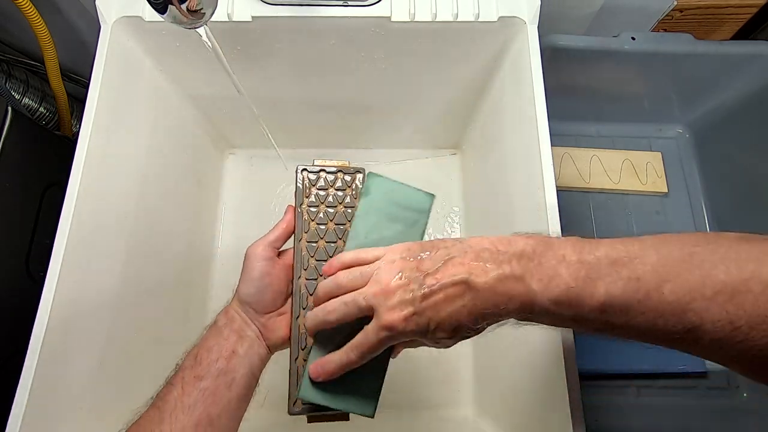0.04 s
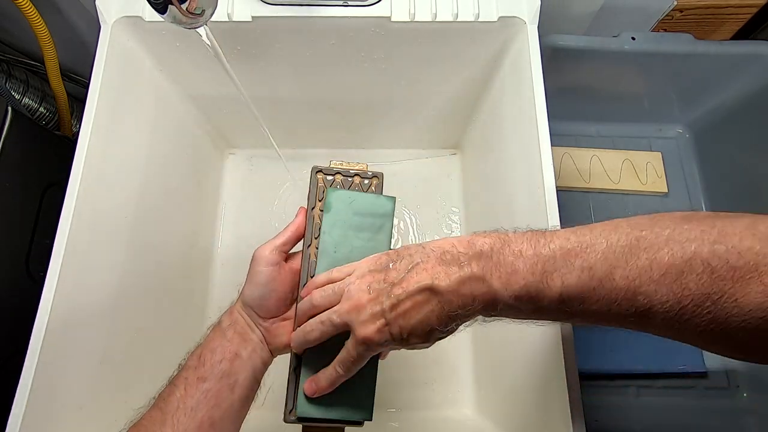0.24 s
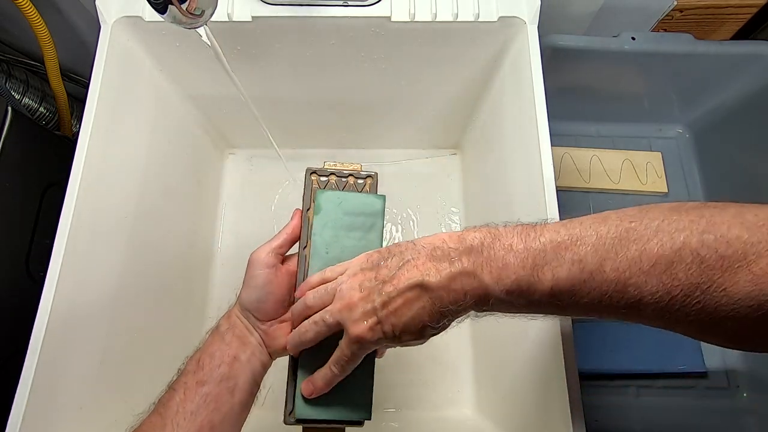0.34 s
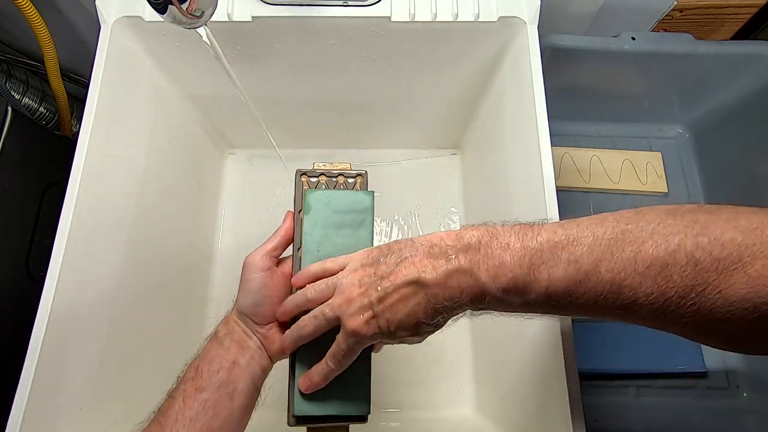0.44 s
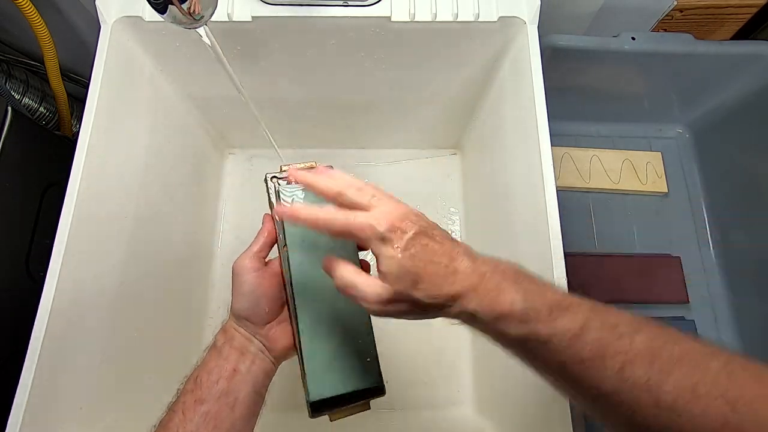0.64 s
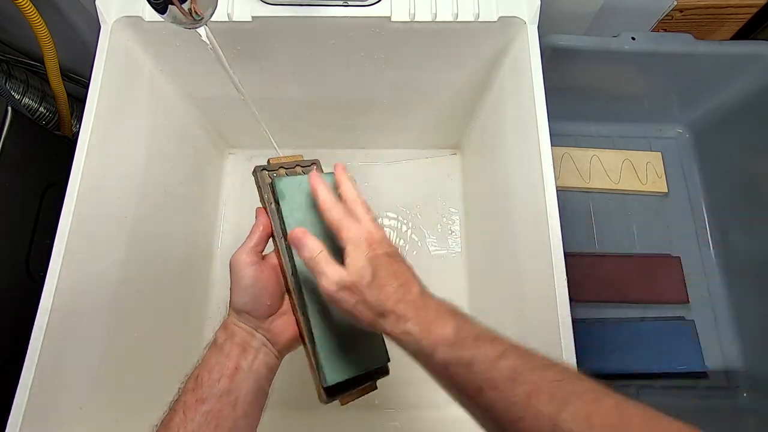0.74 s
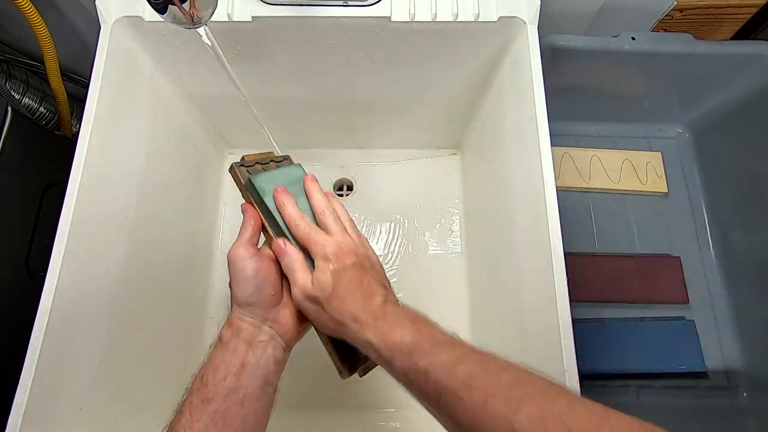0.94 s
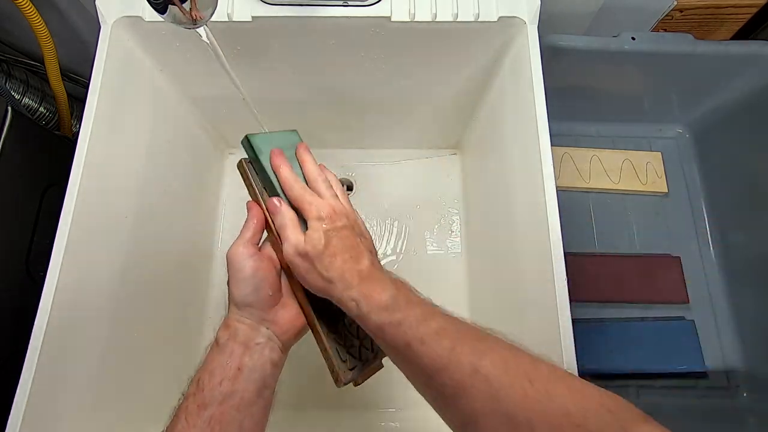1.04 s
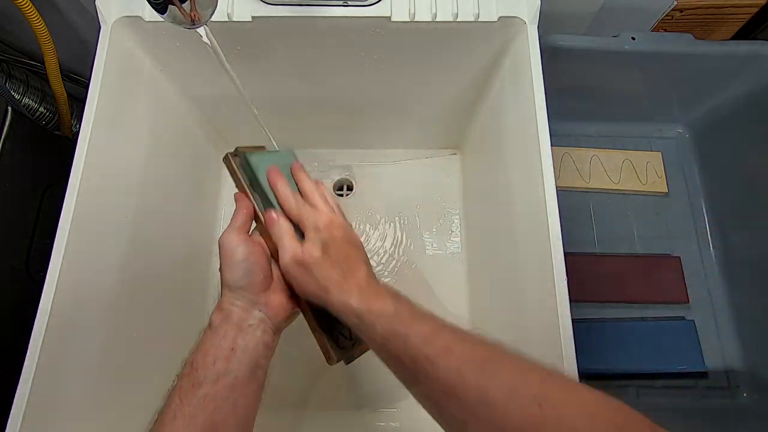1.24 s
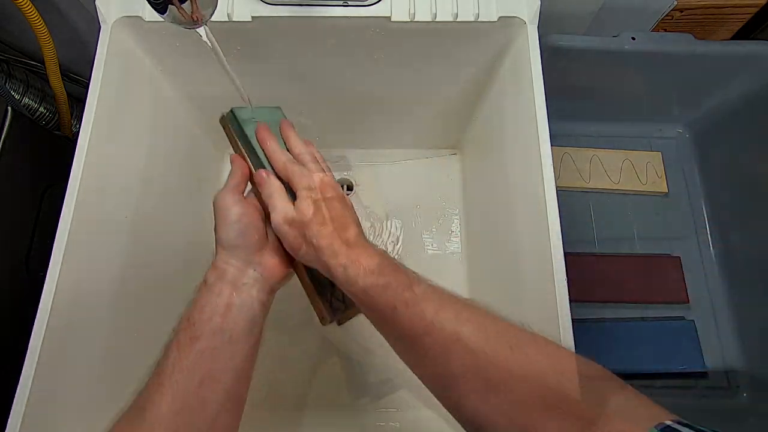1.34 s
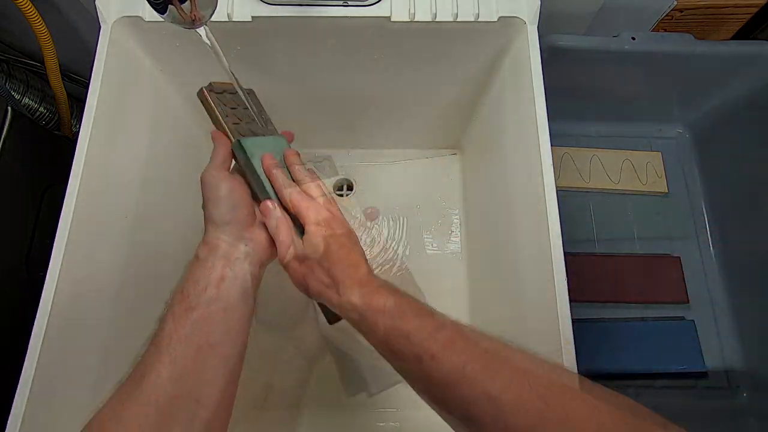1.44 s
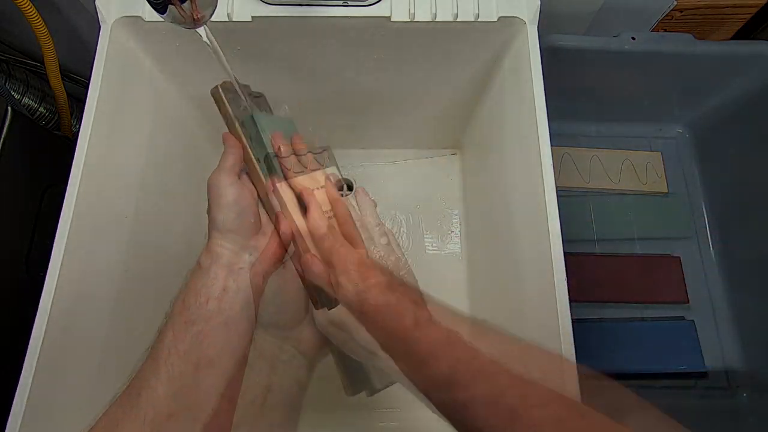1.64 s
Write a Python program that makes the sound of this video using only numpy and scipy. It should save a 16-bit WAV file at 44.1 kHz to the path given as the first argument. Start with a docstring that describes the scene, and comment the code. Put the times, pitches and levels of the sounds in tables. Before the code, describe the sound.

A sharpening stone clinks onto a metal plate three times between about 0.2 and 0.4 seconds, ringing briefly. A faint scrape follows at 0.5 seconds. From about 0.9 seconds to the end at 1.7, the stone rubs in uneven, gritty strokes with tiny squeaks and a thin ring. Throughout, a tap hisses softly into a plastic sink, heard close, with low basin thumps mostly after 1.2 seconds.

```python
"""Three metallic clinks, then gritty scraping in uneven strokes, over the hiss of a running tap.
A sharpening stone is set down on a metal lapping plate: each blow rings the plate's modes.
The stone is then rubbed along it: abrasive grains click, the stone catches and squeaks, the plate sings.
Both are held over a plastic sink; the tap's thin stream drums on the basin throughout."""
import sys
import numpy as np
from scipy import signal
from scipy.fft import rfft, irfft
from scipy.io import wavfile
from scipy.ndimage import uniform_filter1d, minimum_filter1d

SR = 44100
rng = np.random.default_rng(int(sys.argv[2]) if len(sys.argv) > 2 else 0)


def store_pcm(level_fs):
    """Save levels as 16-bit WAV."""
    pcm = np.round(np.clip(level_fs, -1, 1) * 32767).astype(np.int16)
    wavfile.write(sys.argv[1], SR, np.atleast_2d(pcm).T)


N = 74970  # 1.7 s


def undb(db):
    """Decibels to gain."""
    return 10 ** (np.asarray(db) / 20)


def unit(x):
    """Scale to rms 1."""
    return x / np.sqrt(np.mean(x ** 2))


def curve(points):
    """Gain over time from (s, dB) points."""
    return undb(np.interp(np.arange(N) / SR, *np.array(points).T))


def shaped(x, response):
    """Filter by a gain function of frequency; rms 1."""
    hz = np.fft.rfftfreq(N, 1 / SR) + 0.00094  # offset avoids 0 Hz
    return unit(irfft(rfft(x) * response(hz), N))


def colour(x, points):
    """Filter by (Hz, dB) points, falling away below the first; rms 1."""
    hz, db = np.array(points).T
    return shaped(x, lambda f: undb(np.interp(np.log(f), np.log(hz), db)) * np.minimum(f / hz[0], 1) ** 2)


def resonate(x, hz, width_hz):
    """One resonance applied twice; rms 1."""
    return shaped(x, lambda f: 1 / (1 + .5j * (f * f - hz * hz) / (f * width_hz)) ** 2)


def dull(x, cutoff_hz, order=12):
    """Low-pass: a softer contact has less treble; rms 1."""
    return shaped(x, lambda f: 1 / np.hypot(1, (f / cutoff_hz) ** order))


def noise():
    """White noise."""
    return rng.standard_normal(N)


def walk(rate_hz):
    """Smooth random wander; rms 1."""
    return shaped(noise(), lambda f: 1 / (1 + (f / rate_hz) ** 2) ** 2)


def flutter(depth_db, rate_hz):
    """Gain wandering about 0 dB by depth_db rms."""
    return undb(depth_db * walk(rate_hz))


def wobble(hz, spread_hz):
    """Tone whose pitch shakes by spread_hz rms."""
    return np.sin(2 * np.pi * np.cumsum(hz + spread_hz * walk(200 + spread_hz)) / SR)


def grains(per_s, spread_db):
    """Random clicks of uneven size."""
    clicks = (rng.random(N) < per_s / SR) * np.sign(noise())
    return clicks * undb(spread_db * np.minimum(rng.exponential(size=N), 5))


def fade(start_s, t60_s, attack_s=0):
    """Envelope of a blow: swell, then exponential decay."""
    age_s = np.maximum(np.arange(N) / SR - start_s, 0)
    swell = 1 - np.exp(-age_s / (attack_s + 2 / SR))
    return swell * np.exp(-np.log(1000) * age_s / t60_s)


def room(x, echo_db=-17):
    """Add the faint, short echo of a small washroom."""
    response = noise() * fade(start_s=0.0055, t60_s=0.16, attack_s=0.0072)
    response /= np.sqrt(np.sum(response ** 2))
    return x + undb(echo_db) * signal.fftconvolve(x, response)[:N]


def tap(hiss_db=-46.5):
    """Running water hisses and whistles in the spout."""
    # Spectrum of tap and splash. Each row: frequency in Hz, level in dB.
    hiss_spectrum = [(200, -7.5), (450, -3), (750, -3.5), (1300, -9), (2300, -8.5), (3200, -14),
                     (4400, -17.5), (5600, -8), (7000, -2.5), (8300, -4.5), (9500, -11), (11000, -6.5),
                     (13000, -18), (15500, -11.5)]
    # Spout resonances in Hz.
    spout_hz = [4862, 5365, 7280, 8335, 8825, 10235, 11330, 12330, 13995, 14976]
    # Each row, in the same order: width in Hz, level in dB.
    spout_modes = [(29.9, -61.5), (24.8, -64), (247, -56.5), (30, -53.5), (70, -63), (35, -56.5),
                   (70, -66.5), (150, -60), (70, -58), (171, -64)]
    hiss = undb(hiss_db) * flutter(0.5, rate_hz=93) * colour(noise(), hiss_spectrum)
    whistle = sum(undb(db) * resonate(noise(), hz, width_hz)
                  for hz, (width_hz, db) in zip(spout_hz, spout_modes))
    return hiss + whistle


def drumming():
    """Drops of the stream excite the basin's modes."""
    # Each row: frequency in Hz, width in Hz, level in dB.
    basin_modes = [(36, 60, -56.5), (85, 34.4, -44.5), (127.8, 15.5, -49), (199.4, 64, -49.5),
                   (438.3, 30, -55.5)]
    # Swell of the drumming. Each row: time in seconds, gain in dB.
    swell = [(0, 1.5), (0.45, -3.5), (0.75, -4.5), (1.0, -2), (1.1, 2), (1.19, -2.5), (1.35, -1), (1.48, 6),
             (1.56, -4), (1.7, -4)]
    basin = sum(undb(db) * resonate(grains(per_s=500, spread_db=0.5), hz, width_hz)
                for hz, width_hz, db in basin_modes)
    return curve(swell) * basin


def booms():
    """The plastic basin booms briefly and hums on its main mode under the stream."""
    # Each row: start in seconds, level in dB, pitch in Hz, t60 in seconds.
    events = [(0.413, -31.5, 390, .15), (0.465, -41, 77.3, 0.18), (1.246, -31, 88.7, 0.15),
              (1.338, -28.5, 84.3, 0.19), (1.621, -23.5, 155, .14), (1.655, -32.5, 90.2, 0.4)]
    # Each row: time in seconds, level in dB.
    hum_level = [(1.02, -64), (1.1, -44), (1.19, -71), (1.235, -56), (1.26, -36), (1.32, -48),
                 (1.38, -44.5), (1.48, -37.5), (1.57, -56)]
    thumps = sum(undb(db) * wobble(hz, spread_hz=.2 * hz) * fade(start_s, t60_s, attack_s=.008)
                 for start_s, db, hz, t60_s in events)
    hum = curve(hum_level) * unit(wobble(hz=128, spread_hz=5))
    return thumps + hum


def ticks():
    """Coarse grit snaps under the stone."""
    # Each row: start in seconds, level in dB, frequency in Hz, width in Hz.
    snaps = [(0.5, -39.5, 1360, 250), (0.894, -38, 1460, 700), (1.594, -30, 6000, 12000),
             (1.649, -35, 4200, 4500)]
    return sum(undb(db) * resonate(noise(), hz, width_hz) * fade(start_s, t60_s=0.045)
               for start_s, db, hz, width_hz in snaps)


def squeaks():
    """Stick-slip: the stone catches and rasps briefly at a steady or gliding pitch."""
    # Each row: centre in seconds, length in seconds, pitch in Hz, glide in Hz per second,
    # pitch spread in Hz, level in dB.
    catches = [(1.045, 0.036, 2560, 4000, 130, -39.5), (1.07, .045, 4200, 0, 200, -47),
               (1.06, .06, 1780, 0, 70, -45), (1.228, 0.046, 1700, 0, 155, -39.5),
               (1.305, 0.028, 1590, 0, 160, -42), (1.355, 0.04, 3780, -3000, 200, -43.5),
               (1.435, 0.03, 2200, 0, 180, -38.5), (1.51, 0.028, 3390, 0, 130, -40),
               (1.519, 0.015, 2585, 0, 17, -36), (1.57, 0.018, 2600, 0, 110, -41.5),
               (1.63, 0.045, 1520, 1200, 60, -38), (1.595, .018, 4150, 0, 200, -44),
               (1.648, .022, 4250, 0, 170, -41.5), (1.645, .025, 3500, 0, 450, -42)]
    t, out = np.arange(N) / SR, 0
    for centre_s, length_s, hz, glide_hz_per_s, spread_hz, db in catches:
        tone = wobble(hz + glide_hz_per_s * (t - centre_s), spread_hz)
        rasp = unit(tone * flutter(1.5, rate_hz=130))
        envelope = np.exp(-2 * ((t - centre_s) / length_s) ** 2)
        out += undb(db) * rasp * envelope
    return out


def grit():
    """Dense clicks of abrasive grains, in juddering bunches."""
    return grains(per_s=9000, spread_db=2.5) * flutter(3, rate_hz=24)


def patchy(x, count=14, depth_db=1.5):
    """Bands swell and fade independently, most in the midrange; rms 1."""
    hz, spectrum = np.fft.rfftfreq(N, 1 / SR), rfft(x)
    centres_hz = np.geomspace(700, 6000, count)
    depths_db = depth_db * np.hanning(count + 2)[1:-1] ** .5
    bands = (irfft(spectrum * np.interp(hz, centres_hz, weights), N) for weights in np.eye(count))
    return unit(sum(band * flutter(db, rate_hz=40) for band, db in zip(bands, depths_db)))


def pressure(x, centre_hz=1180, width_octaves=0.29):
    """The scrape's middle band fills out as the stone is pressed down and thins as it eases."""
    # Each row: time in seconds, band gain in dB.
    body_gain = [(0.9, 4), (1.05, -10), (1.12, 2), (1.23, 0), (1.7, 2.5)]
    hz = np.fft.rfftfreq(N, 1 / SR) + 1
    bell = np.exp(-.5 * (np.log2(hz / centre_hz) / width_octaves) ** 2)
    return x + (curve(body_gain) - 1) * irfft(rfft(x) * bell, N)


def rubbing(scrape_db=-1, ring_db=2.5, hollow_db=-13.5):
    """Grit scrapes and crackles with the strokes and excites stone and plate; the plate sings."""
    # Effort of the strokes. Each row: time in seconds, level in dB.
    effort = [(0.47, -62), (0.52, -48.5), (0.56, -49), (0.62, -63), (0.86, -59.5), (0.92, -50),
              (0.965, -42.5), (1.0, -47), (1.058, -34), (1.10, -38.5), (1.14, -43), (1.225, -35.5),
              (1.25, -35.5), (1.275, -42), (1.30, -37), (1.34, -34), (1.372, -31), (1.402, -39.5),
              (1.422, -34.5), (1.475, -36.5), (1.515, -34), (1.545, -42.5), (1.59, -35), (1.645, -37.5),
              (1.678, -47), (1.7, -33)]
    # Spectra of scrape and fine crackle. Each row: frequency in Hz, level in dB.
    scrape_spectrum = [(200, -9), (440, 2.5), (650, -2), (950, -6), (1250, -0.5), (1750, -0.5), (2050, 1),
                       (2550, -1), (3100, -1), (3800, -2.5), (4400, -2.5), (5300, -10), (7500, -6.5),
                       (11000, -16), (15000, -23)]
    crackle_spectrum = [(2500, -14), (6000, -2.5), (10000, -1), (15000, -11)]
    # Resonances of stone and plate pressed together, in Hz.
    pair_hz = [1160, 1470, 1630, 1780, 2220, 2600, 3550, 3720, 4240]
    # Each row, in the same order: width in Hz, relative level in dB.
    pair_modes = [(61, -20.5), (40, -18), (100, -17.5), (79.6, -13.5), (55, -18), (120, -15.5), (70, -22.5),
                  (70, -17), (160, -20)]
    # Low mids and crackle. Each row: time in seconds, gain in dB on top of the effort.
    hollow_gain = [(0.9, -1), (1.3, -24), (1.42, -2.5), (1.5, 8), (1.7, 7)]
    crackle_gain = [(0.9, -36), (1.1, -4), (1.35, -12.5), (1.52, -7), (1.6, -5.5), (1.7, -6)]
    # The plate's singing tone. Each row: time in seconds, level in dB.
    sing_level = [(0.88, -74), (0.94, -55), (1.0, -70), (1.05, -53), (1.10, -42), (1.16, -57), (1.22, -42),
                  (1.27, -62), (1.315, -44.5), (1.37, -55), (1.45, -60)]
    ring = sum(undb(db) * resonate(grit(), hz, width_hz)
               for hz, (width_hz, db) in zip(pair_hz, pair_modes))
    sing = curve(sing_level) * unit(wobble(hz=4772, spread_hz=16) * flutter(1.5, rate_hz=40))
    hollow = undb(hollow_db) * curve(hollow_gain) * resonate(grit(), hz=490, width_hz=330)
    crackle = curve(crackle_gain) * colour(grains(per_s=2000, spread_db=1), crackle_spectrum)
    scrape = pressure(patchy(colour(grit(), scrape_spectrum)))
    return curve(effort) * (undb(scrape_db) * scrape + undb(ring_db) * ring + hollow + crackle) + sing


def clinks(settled_s=0.39, choke_t60_s=0.15, knock_db=3, push_db=-1.5, push_hz=63.5):
    """Each blow cracks, thuds in the hands and rings the plate; the basin scatters it into a clatter."""
    # Each row: start in seconds, ring, clatter, crack and thud levels in dB, treble cutoff in Hz,
    # factor on the ring's t60, ring attack in seconds.
    blows = [(0.2182, -7, -13.5, -16.5, -14.5, 13000, 1.0, 0.0043),
             (0.2690, -5.5, -9, -10.5, -17.5, 12100, 0.78, 0.003),
             (0.3703, -15.5, -45, -10.5, -26, 4740, 0.58, 0.0074)]
    # Modes of plate and stone in Hz.
    mode_hz = [1262, 1371, 1448, 1822, 2090, 2248, 2347, 2396, 2660, 2795, 2988, 3455, 3510, 3611, 3631,
               4303, 4740, 4868, 5060, 5561, 6255, 6560, 6840, 7494, 7790, 8490, 8915, 9740]
    # Each row, in the same order: base t60 in seconds, relative level in dB in blows one, two and three.
    modes = [(0.25, -14.5, -14.5, -4.5), (0.16, -9, -11.5, -12), (0.051, -30.5, -37.5, 11.5),
             (0.32, -4.5, -18, -5.5), (0.133, -32, -17, -1.5), (0.077, -15, -11.5, -3),
             (0.3, -18, -26, -25), (0.074, -29, -11, 0), (0.14, -7, -2.5, -4), (0.096, -19, -22, -25),
             (0.084, -15, -7.5, -33), (0.073, -18, 0, -32), (0.21, -32, 0.5, 2.5), (0.091, 4.5, -3, -34),
             (0.078, 0.5, 2.5, -30), (0.24, -22, -46, -16), (.03, -28, 6.5, -14), (0.11, -9.5, -7.5, -37),
             (0.053, -26, -8, -39), (0.099, -32, -15, -45), (0.18, -29.5, -27, -53),
             (0.08, -40.5, -24, -50), (0.075, -15.5, -23, -56), (0.2, -29, -38, -55),
             (0.069, -28.5, -19.5, -50), (0.086, -22, -19.5, -50), (0.22, -29.5, -52, -50),
             (0.159, -32, -45, -55)]
    # Dense short resonances of stone and basin. Each row: frequency in Hz, level in dB.
    clatter_spectrum = [(500, -48), (850, -14), (1300, -0.5), (1700, -7.5), (2600, 5), (3200, -8),
                        (3650, -1), (4200, -9), (4900, 0), (5700, -23), (8300, -26.5), (10000, -31.5),
                        (15000, -26)]
    # Dull thud through the hands. Each row: frequency in Hz, level in dB.
    thud_spectrum = [(40, 7), (100, -8.5), (250, -6), (450, -1.5), (800, -11), (1500, -2.5), (5000, -72)]
    t, out = np.arange(N) / SR, 0
    waver = flutter(3, rate_hz=107)  # basin reflections make each ring uneven
    choke = np.exp(-np.log(1000) * np.maximum(t - settled_s, 0) / choke_t60_s)  # the stone lies flat
    for k, blow in enumerate(blows):
        start_s, ring_db, clatter_db, crack_db, thud_db, cutoff_hz, t60_factor, attack_s = blow
        for hz, (t60_s, *mode_db) in zip(mode_hz, modes):
            tone = np.sin(2 * np.pi * (hz * (t - start_s) + rng.random()))
            envelope = fade(start_s, t60_s * t60_factor, attack_s) * choke
            out += undb(ring_db + mode_db[k]) * tone * envelope * np.roll(waver, rng.integers(N))
        clatter = undb(clatter_db) * fade(start_s, t60_s=.08, attack_s=0.0015)
        crack = undb(crack_db) * fade(start_s, t60_s=.014, attack_s=0.000044)
        out += (clatter + crack) * dull(colour(noise(), clatter_spectrum), cutoff_hz)
        thud = colour(noise(), thud_spectrum) * fade(start_s, t60_s=.05, attack_s=0.00033)
        knock = fade(start_s, t60_s=.009, attack_s=.0004)  # one-sided contact pulse
        # The plate gives in the hand.
        push = np.sin(2 * np.pi * push_hz * (t - start_s)) * fade(start_s, t60_s=0.021)
        out += undb(thud_db) * (thud + undb(knock_db) * knock + undb(push_db) * push)
    return out


def scene():
    """Stone, plate and water, close up, in mono."""
    stone = room(clinks()) + ticks() + rubbing() + squeaks()
    sink = tap() + drumming() + booms()
    return (stone + sink)[None]


def record(dry):
    """A fast limiter holds down the peaks; a steep low-pass cuts the top."""
    ceiling, hold_s, top_hz = 0.97, 0.0011, 15700
    window = int(hold_s * SR) + 1
    needed_gain = ceiling / np.maximum(np.abs(dry), ceiling)
    gain = uniform_filter1d(minimum_filter1d(needed_gain, window), window)
    lowpass = signal.ellip(10, .2, 80, top_hz, fs=SR, output="sos")
    return signal.sosfilt(lowpass, dry * gain)


dry = scene()
out = record(dry)
store_pcm(out)
```